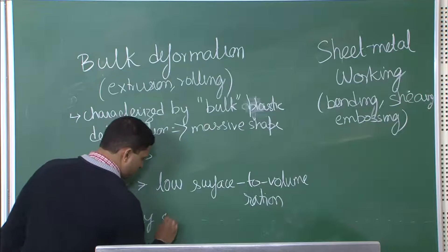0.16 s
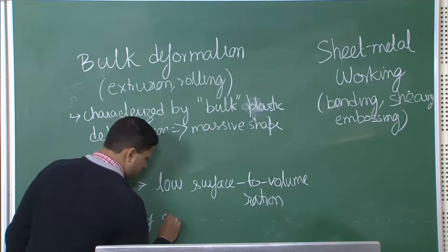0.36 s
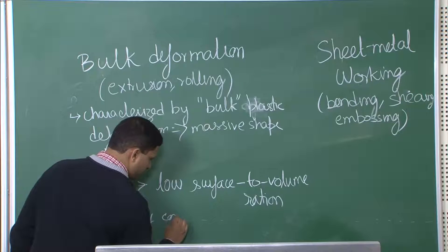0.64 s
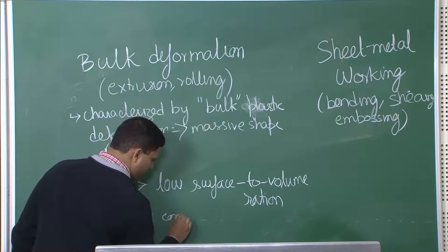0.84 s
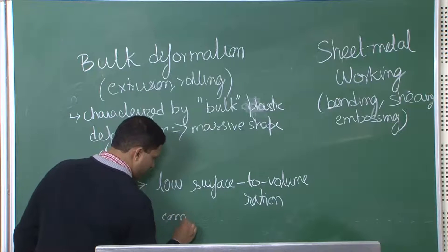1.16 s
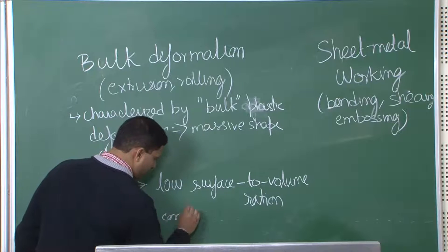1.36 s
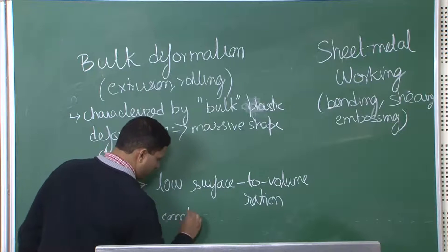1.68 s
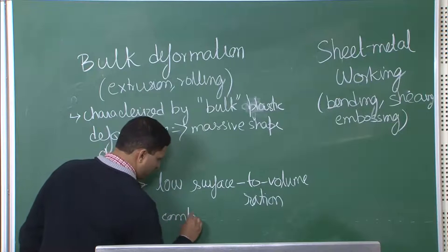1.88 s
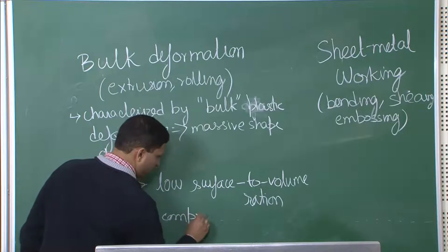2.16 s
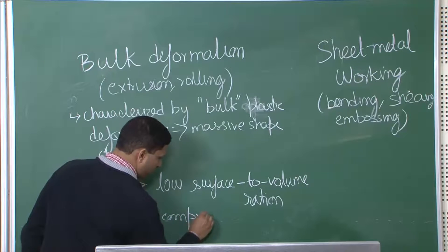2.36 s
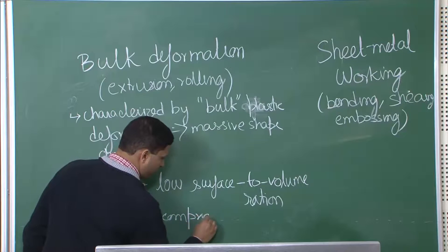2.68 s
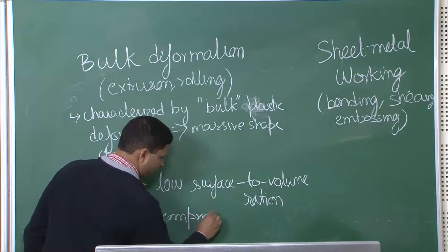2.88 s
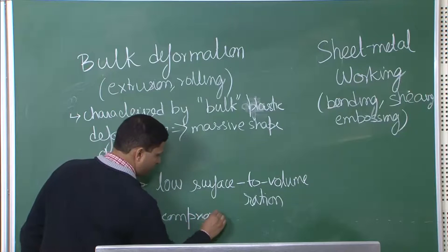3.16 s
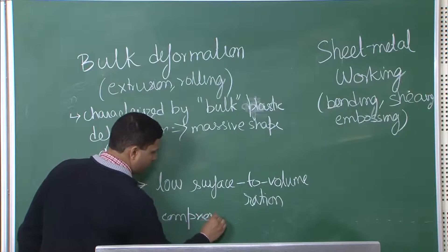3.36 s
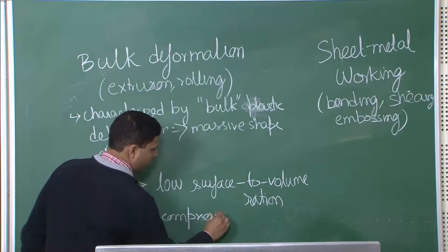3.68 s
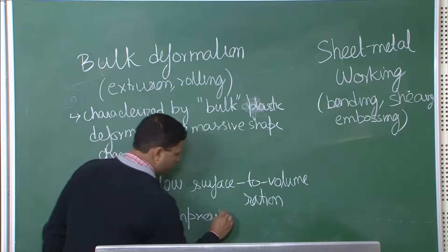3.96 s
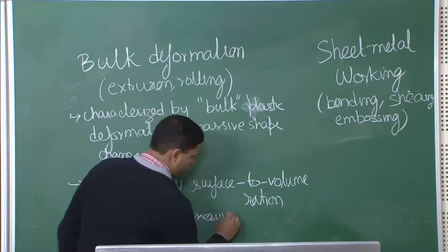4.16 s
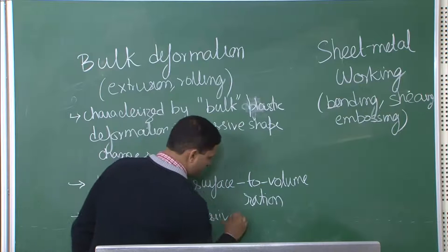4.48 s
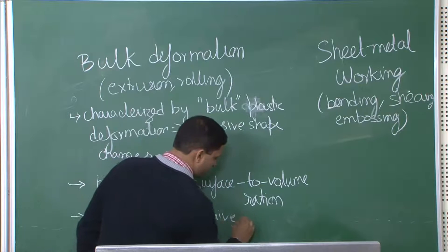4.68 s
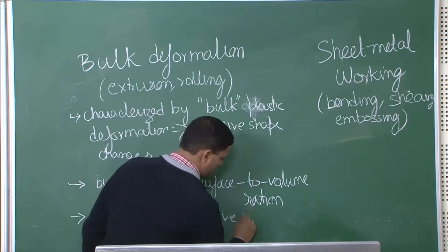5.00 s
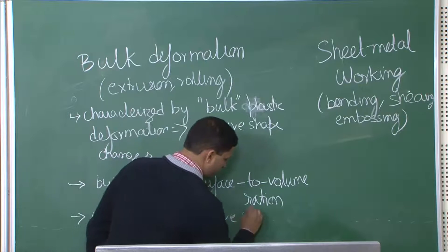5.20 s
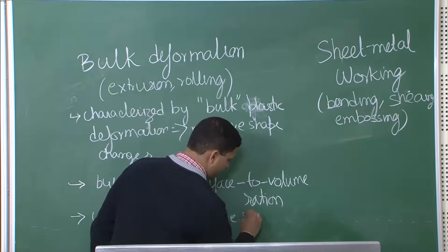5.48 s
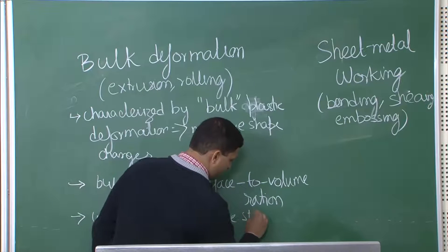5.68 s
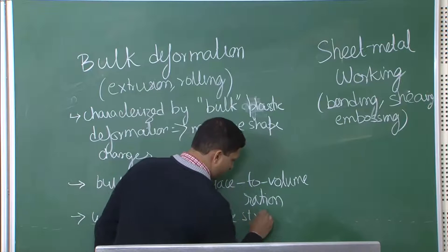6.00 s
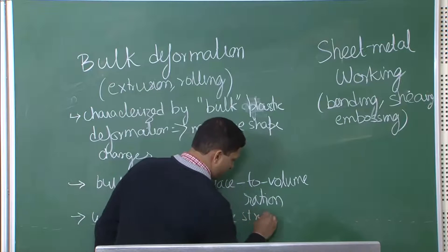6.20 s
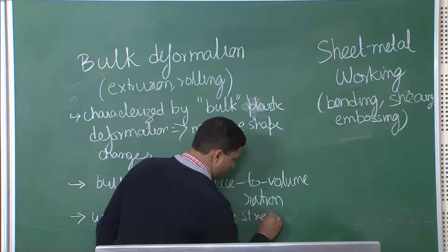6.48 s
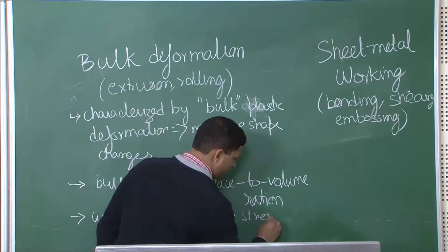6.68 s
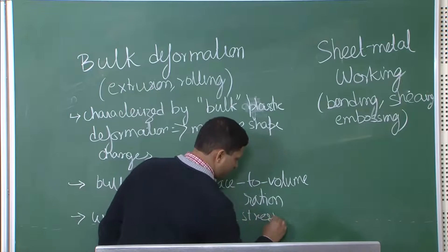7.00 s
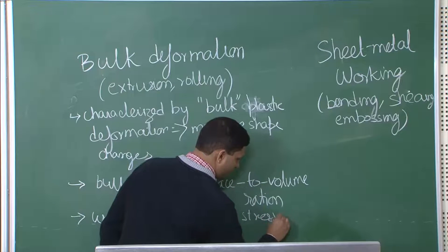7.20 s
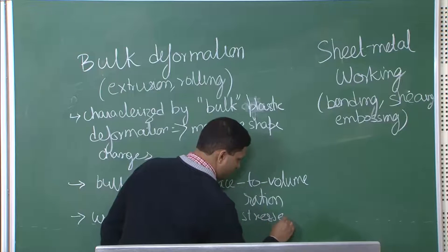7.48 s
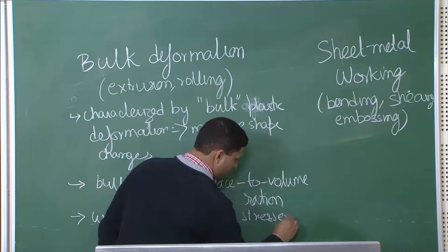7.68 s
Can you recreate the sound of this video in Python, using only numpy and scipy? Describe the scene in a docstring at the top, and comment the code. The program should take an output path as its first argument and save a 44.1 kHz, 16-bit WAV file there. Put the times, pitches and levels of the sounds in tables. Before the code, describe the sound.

Chalk writes on a wall-mounted chalkboard in a quiet classroom, close to the microphone. It begins with short, crumbly scraping strokes, then firmer taps join in, each a sharp click with a low knock from the board. Strokes and taps alternate unevenly to the end, with an occasional rasp or soft thud. A low ventilation rumble runs underneath, and the room adds a brief echo.

```python
"""A quiet classroom, one microphone close to a wall-mounted board; someone chalks a few words.
Low ventilation rumble is there from the start, and over it the chalk crumbles along in short scraping
strokes, now and then landing with a soft low thud or catching with a rasp. From 1.3 s on, firmer
touch-downs fall among the strokes: each clicks and makes the panel knock. The room adds a brief tail
to the writing, which goes on to the end."""
import sys
import numpy as np
from scipy import signal
from scipy.fft import rfft, irfft, next_fast_len
from scipy.io import wavfile
from scipy.ndimage import uniform_filter1d, map_coordinates

SR = 44100
rng = np.random.default_rng(int(sys.argv[2]) if len(sys.argv) > 2 else 0)


def materialize(psi):
    """Save the field psi as 16-bit PCM at rate SR to the path in sys.argv[1].

    A 1-D psi becomes a single channel; in a 2-D psi each row is a channel.
    """
    bounded = np.clip(np.atleast_2d(psi).T, -1, 1)
    quanta = np.round(bounded * 32767).astype(np.int16)
    wavfile.write(sys.argv[1], SR, quanta)


N = 346076


def undb(db):
    """Decibels to gain."""
    return 10 ** (np.asarray(db) / 20)


def unit(x):
    """Scale to rms 1."""
    return x / np.sqrt(np.mean(x ** 2))


def bins(size):
    """Frequencies of a spectrum, kept above zero."""
    return np.maximum(np.fft.rfftfreq(size, 1 / SR), 1)


def colour(points, hz):
    """Gain of (Hz, dB) points joined on a log-frequency axis."""
    point_hz, db = np.transpose(points)
    return undb(np.interp(np.log(hz), np.log(point_hz), db))


def bell(hz, centre_hz, width_hz):
    """Gain of one resonance, 1 at its centre."""
    return 1 / (1 + (2 * (hz - centre_hz) / width_hz) ** 2)


def shaped(x, response):
    """Filter a long sound by a gain given as a function of frequency; the result has rms 1."""
    size = next_fast_len(N)
    return unit(irfft(rfft(x, size) * response(bins(size)), size)[..., :N])


def tint(x, points):
    """Give a long sound a colour of (Hz, dB) points, at rms 1."""
    return shaped(x, lambda hz: colour(points, hz))


def resonate(x, centre_hz, width_hz):
    """Pass a long sound through one resonance, at rms 1."""
    return shaped(x, lambda hz: bell(hz, centre_hz, width_hz))


def causal(gain):
    """The most abrupt impulse response that has this magnitude."""
    cepstrum = irfft(np.log(gain + 1e-9))
    half = len(cepstrum) // 2
    cepstrum[1:half] *= 2
    cepstrum[half + 1:] = 0
    return irfft(np.exp(rfft(cepstrum)))


def fade(t, t60):
    """Exponential decay, 60 dB down at t60."""
    return np.exp(-np.log(1000) * t / t60)


def walk(rate):
    """Random levels held 1 / rate seconds and slewed, at rms 1."""
    hold = max(int(SR / rate), 1)
    steps = np.repeat(rng.standard_normal(N // hold + 1), hold)
    return unit(uniform_filter1d(steps, hold)[:N])


def add(out, x, start_s):
    """Mix x into out from a given time."""
    i = max(int(start_s * SR), 0)
    out[i:i + len(x)] += x[:N - i]


def ventilation(air_db=-60.5):
    """Room tone: steady air noise that excites a few low room resonances."""
    # Ventilation and microphone hiss. Each row: frequency in Hz, relative level in dB.
    air_colour = [(20, -46), (50, -22), (90, -12), (135, -5.5), (180, 0.5), (260, -4.5), (340, -9.5),
                  (440, -8), (600, -14), (950, -11.5), (1600, -16), (3300, -27), (5000, -31), (10000, -35),
                  (14000, -46.5)]
    # Each row: centre in Hz, width in Hz, rms level in dB.
    room_modes = [(172.8, 11.7, -67.5), (230, 19, -71), (321.7, 27, -67.5)]
    out = undb(air_db) * tint(rng.standard_normal(N), air_colour)
    for hz, width_hz, db in room_modes:
        out += undb(db) * resonate(rng.standard_normal(N), hz, width_hz)
    return out


def hand_gains():
    """Drone, scrape and hiss gains: each stroke is one arch of speed as the hand bears down or eases."""
    # Sweeps of the hand. Each row: start and length in seconds, mid-stroke scrape level in dB,
    # board drone and powder hiss in dB relative to the scrape, rise in pressure over the stroke in dB.
    sweeps = [(-.03, 0.062, -61.5, 0.5, -4, -3), (0.073, 0.072, -58, -7, -7.5, 0),
              (0.119, 0.2, -59.5, -3.5, -6, -10), (0.323, 0.11, -57, -2.5, -6, -6),
              (0.412, 0.071, -60.5, -2.5, -9, 0), (0.468, 0.1, -60.5, 0, -5, -3),
              (0.572, 0.11, -64, -8, -2, 1), (0.692, 0.11, -65, 1, -2, -2),
              (0.779, 0.053, -60.5, -5.5, -12, -3), (0.826, 0.094, -60.5, -5, -4, -1),
              (0.941, 0.14, -60.5, -2.5, -7.5, -3), (1.071, .12, -62.5, -3, -4.5, 7),
              (1.206, 0.017, -62, -10, -11, 0), (1.369, .1, -58, -4.5, -4, 7),
              (1.457, 0.069, -57, -5, -7.5, 6), (1.69, 0.084, -55, -4, -6, 6),
              (1.792, .09, -58.5, -6, -7.5, 4), (2.03, 0.11, -62, -1, -6, -3),
              (2.189, 0.058, -61, 4.5, -1.5, 1), (2.231, 0.046, -60, -1, -6, 11),
              (2.402, 0.18, -62, 0, -5, -2), (2.58, 0.22, -62.5, -4, -4, -3),
              (2.727, 0.16, -63.5, 2.5, -3.5, -2), (2.879, 0.096, -64, -4.5, -2, -9),
              (2.982, 0.077, -59.5, 3.5, -10, 1), (3.033, .12, -58, 1.5, -13.5, -2),
              (3.129, 0.089, -64, 3.5, -6.5, -1), (3.225, 0.1, -62, -3.5, -7.5, -5),
              (3.341, 0.097, -64.5, 2.5, -11, -7), (3.417, 0.19, -67.5, 2, -12, 4),
              (3.539, 0.15, -60.5, 2, -11, -8), (3.691, 0.12, -59.5, 2.5, -15, 6),
              (3.978, 0.12, -60.5, -5, -10.5, -13), (4.109, 0.081, -59, 5.5, -10.5, -6),
              (4.305, 0.14, -66, -12, -6, -8), (4.403, 0.088, -62.5, 4.5, -10, 18),
              (4.497, 0.19, -61.5, -6, -8.5, -9), (4.631, 0.046, -56.5, 4, -8, 9),
              (4.862, 0.1, -57.5, -6, -8, 1), (4.967, 0.083, -57.5, -3.5, -9, -5),
              (5.048, 0.18, -72, 3, -23, -8), (5.247, 0.14, -59.5, 0.5, -7, -1),
              (5.55, 0.023, -53, 4.5, -14, 13), (5.699, 0.11, -60.5, 0, -2, -3),
              (5.837, .11, -65.5, 8, -1, 4), (6.058, 0.074, -66.5, -6, -3, 0), (6.123, .11, -61, 1, -5, -4),
              (6.255, 0.1, -62, 0, -4, 3), (6.335, 0.16, -62, -2, -5.5, -14),
              (6.466, 0.1, -62.5, 1, -2.5, 12), (6.567, .1, -59, -6, -4, -4),
              (6.67, .065, -61.5, -5, -3.5, 0), (6.756, 0.081, -60, -5, -9.5, 4),
              (6.84, .026, -56.5, -4, -7, -1), (6.903, .1, -60, -4, -2, 2),
              (7.0, 0.089, -64.5, -5, -8.5, 9), (7.217, 0.14, -60, -3, -8, -8),
              (7.355, .1, -59.5, -4.5, -4, -1), (7.44, .125, -57, -4.5, -7, -10),
              (7.556, 0.086, -59, -3, -3, 5), (7.662, .095, -60.5, -5, -1.5, -7),
              (7.749, 0.071, -59, -4, -2.5, 2), (7.787, 0.037, -55, -8, -13, 1)]
    speed_powers = (0.52, 0.69, 0.79)  # drone, scrape, hiss
    hiss_share = 0.65  # of a pressure change; the hiss follows speed more than pressure
    energies = np.zeros((3, N))  # overlapping strokes add in energy
    for start_s, length_s, db, drone_db, hiss_db, rise_db in sweeps:
        skipped = max(int(-start_s * SR), 0)
        along = np.linspace(0, 1, int(length_s * SR))[skipped:]
        speed = 4 * along * (1 - along)
        push_db = rise_db * (along - .5)
        levels_db = (db + drone_db + push_db, db + push_db, db + hiss_db + hiss_share * push_db)
        for energy, level_db, power in zip(energies, levels_db, speed_powers):
            add(energy, (undb(level_db) * speed ** power) ** 2, start_s)
    return np.sqrt(energies)


def crumble(per_second, spread_db):
    """Tiny fractures of the chalk tip: dense clicks of unequal size."""
    breaks = rng.random(N) < per_second / SR
    return breaks * rng.standard_normal(N) * undb(spread_db * rng.standard_normal(N))


def travel(x, patchy_db, width_hz, hold_s):
    """As the contact point moves over the board, resonances about width_hz wide swell and fade."""
    hz, t, frames = signal.stft(x, SR, nperseg=512)
    field = rng.standard_normal((128, 512))
    grid = np.meshgrid(hz / width_hz, t / hold_s, indexing="ij")
    swell = map_coordinates(field, grid, order=2, mode="wrap")
    return signal.istft(frames * undb(patchy_db * swell), SR)[1][:N]


def strokes():
    """The sliding tip sticks and slips; its fractures drive the board, the stick and a powdery hiss."""
    # Three colours of sliding chalk. Each row: frequency in Hz, relative level in dB.
    board_drone = [(60, -42), (130, 8.5), (300, 6), (480, -11), (700, 3), (1100, 5.5), (1600, 4), (2100, 2),
                   (3000, -38), (6000, -46)]
    stick_scrape = [(700, -17.5), (1500, -24.5), (2200, -1.5), (2700, -3.5), (3400, -3), (4200, -7.5),
                    (5000, -12), (6000, -24), (9000, -27.5)]
    powder_hiss = [(3500, -29), (5600, -9), (6300, -4), (6950, -0.5), (7600, -6.5), (8600, -7), (9800, -12),
                   (11600, -11.5), (13000, -18), (14500, -34)]
    grip = undb(0.72 * walk(rate=55) + 0.68 * walk(rate=260))
    out = np.zeros(N)
    for gain, points in zip(hand_gains(), (board_drone, stick_scrape, powder_hiss)):
        grains = crumble(per_second=16000, spread_db=2.5) * grip
        grains = travel(grains, patchy_db=2.2, width_hz=380, hold_s=.04)
        out += gain * tint(grains, points)
    return out


def thuds_and_rasps(width_hz=500, board_width_hz=130, board_below_hz=500, sag=.02):
    """Brief, noisy rings of one resonance of board or stick, each sagging slightly in pitch."""
    # Rows up to 300 Hz are soft low thuds of the board as the chalk lands at a stroke's start;
    # the rest are rasps where it catches and slips.
    # Each row: start and length in seconds, pitch in Hz, rms level in dB.
    rings = [(0.094, 0.043, 288, -53.5), (.095, 0.1, 3720, -62), (.335, 0.077, 3900, -64),
             (0.338, 0.059, 300, -56.5), (0.993, .04, 3450, -59), (1.72, .04, 7200, -63),
             (2.47, 0.068, 3180, -65), (2.738, 0.048, 1070, -56.5), (3.354, 0.04, 252, -61),
             (4.32, 0.04, 3500, -62), (4.444, .045, 2870, -66), (4.643, .036, 2850, -53.5),
             (4.889, 0.043, 3320, -57.5), (5.858, 0.047, 421, -56), (5.868, 0.06, 1300, -59.5),
             (6.931, .049, 7120, -65)]
    out, jolts = np.zeros(N), rng.standard_normal((2, N))
    # A slowly turning random phasor gives a resonance its width; the board's low ones are narrower.
    wide, narrow = resonate(jolts, 0, width_hz), resonate(jolts, 0, board_width_hz)
    for start_s, length_s, hz, db in rings:
        phasor = narrow if hz < board_below_hz else wide
        real, imag = phasor[:, int(start_s * SR):int((start_s + length_s) * SR)]
        pitch_hz = np.linspace(hz, hz * (1 - sag), len(real))
        phase = 2 * np.pi * np.cumsum(pitch_hz) / SR
        ring = real * np.cos(phase) + imag * np.sin(phase)
        add(out, undb(db) * signal.windows.tukey(len(ring), .5) * ring, start_s)
    return out


def scatter(t, edge_db, edge_t60):
    """The direct wave, waves returning from the board's edges, and close echoes; energy 1."""
    # The first row is a wave returning from a near edge of the board; the rest come from the wall behind the
    # panel and nearby surfaces. Each row: delay in seconds, level in dB.
    echoes = [(.0009, -7.5), (.0057, -14), (.0067, -10), (0.0142, -23)]
    edges = rng.standard_normal(len(t)) * fade(t, edge_t60) * (1 - fade(t, 0.0019))
    response = undb(edge_db) * edges / np.linalg.norm(edges)
    response[0] += 1
    for delay_s, db in echoes:
        response[int(delay_s * SR * (1 + rng.uniform(-.06, .06)))] += undb(db)
    return response / np.linalg.norm(response)


def taps(size=16384):
    """The chalk lands: a click as bright as the contact is hard, crushed grit, the panel's slower flex."""
    # Each row: start in seconds, click level, knock level and knock's bass lift in dB,
    # contact corner in Hz, ring of the struck spot in Hz, its lift in dB, grit within the click in dB.
    touch_downs = [(1.3284, 5.5, 11, -9.5, 940, 2830, 10.5, -36), (1.551, -21, -16, 1, 1400, 3070, 19, -9),
                   (1.6851, -1, 12.5, -8.5, 1930, 4100, 19.5, -16),
                   (1.9946, 4.5, 12.5, -6.5, 2630, 2040, 3, -15),
                   (2.3922, 0.5, 6.5, -8, 1450, 3100, 8.5, -21),
                   (3.5296, 4.5, 3.5, 1.5, 3080, 1550, 5.5, -19.5),
                   (3.6926, -9, -9, -16, 1310, 4120, 17, -35), (3.769, 6.5, 7, 1, 2320, 1580, 5, -31),
                   (3.9346, 5.5, 6, 2.5, 4280, 1690, 8, -15), (4.31, -7, -1.5, -11.5, 1680, 3730, 3, -26),
                   (4.8183, 5, 7.5, -1.8, 1980, 2130, 4.5, -28),
                   (5.2069, 6, 10.5, -3.5, 3470, 1950, 4.5, -14.5),
                   (5.5055, 5, 6.5, -1.5, 3170, 2000, 5, -15.5), (5.6528, 5.5, 6, 0, 2030, 2140, 7, -24.5),
                   (6.0498, 4, 5.5, -6, 1520, 3960, 9, -16), (6.8425, -32, -27, -7, 7000, 2670, 15.5, -10),
                   (7.1847, -1.5, 2.5, -8.5, 2100, 3020, 8.5, -15)]
    # Colours of the click, the crushed grit and the flex. Each row: frequency in Hz, gain in dB.
    click_colour = [(250, -15), (500, -7), (750, -3), (1100, -2), (1500, -1.5), (1850, -3), (2250, -1.5),
                    (2700, 0.5), (3400, 1.5), (4200, -5.5), (5500, -12.5), (9000, -19), (13000, -33)]
    grit_colour = [(1500, -26), (3500, 1), (6000, -11), (9000, -15.5), (11500, -24), (13500, -40)]
    flex_colour = [(25, -44), (50, -6.5), (75, -3), (130, 8), (200, 4.5), (290, 0.5), (370, -3.5),
                   (450, -19), (800, -28.5), (3000, -64)]
    # Each row: centre in Hz, width in Hz, level in dB relative to the flex.
    panel_modes = [(62, 7, -7), (88.8, 9.6, 2), (126.9, 8.5, -1), (174.3, 7, -2), (243.3, 6.7, -5),
                   (297, 13, -2)]
    at_mic, into_room = np.zeros(N), np.zeros(N)
    t, hz = np.arange(size) / SR, bins(size)
    modes = sum(undb(db) * bell(hz, centre, width) for centre, width, db in panel_modes)
    panel = colour(flex_colour, hz) * (1 + modes)
    bass_shelf = 1 / (1 + (hz / 160) ** 4)
    grit_filter = rfft(causal(colour(grit_colour, hz)))
    # Bending waves are dispersive: the lower they are, the later they arrive.
    lag_s = .0012  # at 100 Hz
    dispersion = np.exp(-4j * np.pi * lag_s * np.sqrt(100 * hz))
    for start_s, click_db, knock_db, bass_db, corner_hz, ring_hz, ring_db, grit_db in touch_downs:
        contact = 1 / np.sqrt(1 + (hz / corner_hz) ** 6)
        spot = undb(ring_db * np.exp(-(np.log(hz / ring_hz) / 0.2) ** 2))
        crunch = rng.standard_normal(size) * fade(t, t60=0.0067)
        grit = undb(grit_db) * irfft(rfft(crunch / np.linalg.norm(crunch)) * grit_filter)
        click = undb(click_db) * (causal(colour(click_colour, hz) * contact * spot) + grit)
        echoed = signal.fftconvolve(click, scatter(t, edge_db=-2, edge_t60=0.03))[:size]
        # The place of the blow decides how much the deepest modes take.
        flex = causal(panel * undb(bass_db * bass_shelf))
        knock = undb(knock_db) * irfft(rfft(flex) * dispersion)
        # The board is pushed away, so the pressure falls first.
        add(at_mic, -echoed - knock, start_s)
        add(into_room, -click - knock, start_s)
    return at_mic, into_room


def classroom(x, size=32768, build_s=0.011):
    """A diffuse tail that builds up over the first reflections and dies by octave band."""
    # Each row: band centre in Hz, gain in dB, time to fall 60 dB in seconds.
    octaves = [(125, -10, 0.21), (265, -7.5, 0.31), (543, -12, 0.15), (984, -14, 0.41), (1970, -12.5, 0.36),
               (4050, -12, 0.39), (7950, -7.5, 0.13)]
    t, tail = np.arange(size) / SR, np.zeros(size)
    for hz, db, t60 in octaves:
        band = signal.butter(3, [hz / np.sqrt(2), hz * np.sqrt(2)], "band", fs=SR, output="sos")
        noise = signal.sosfilt(band, rng.standard_normal(size))
        envelope = fade(t, t60) * np.clip(t / build_s, 0, 1) ** 2
        tail += undb(db) * noise * envelope / np.linalg.norm(envelope)
    return signal.fftconvolve(x, tail)[:N]


def scene():
    """Strokes and taps close to the microphone, the room's tail and ventilation behind them; mono."""
    taps_at_mic, taps_into_room = taps()
    writing = strokes() + thuds_and_rasps()
    tail = classroom(taps_into_room + writing)
    return (taps_at_mic + writing + tail + ventilation())[None]


def record(dry, top_hz=14200):
    """The recorder cuts the top treble steeply."""
    return signal.sosfilt(signal.ellip(10, .2, 70, top_hz, fs=SR, output="sos"), dry)


dry = scene()
out = record(dry)
materialize(out)
```